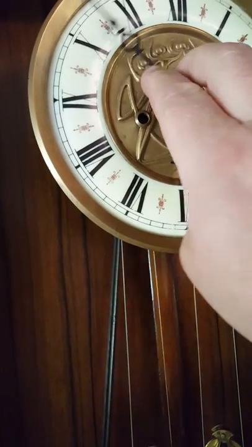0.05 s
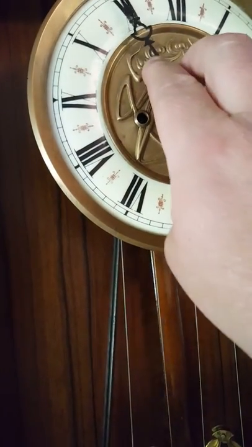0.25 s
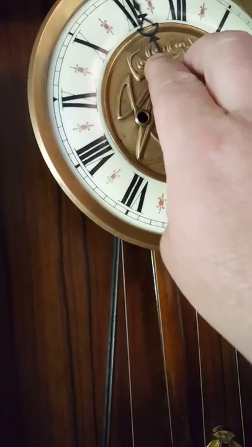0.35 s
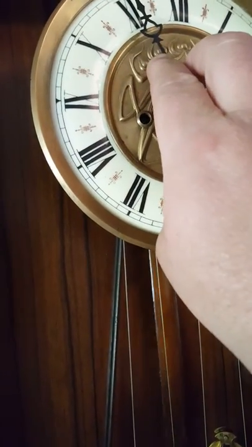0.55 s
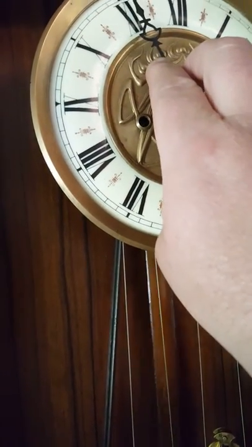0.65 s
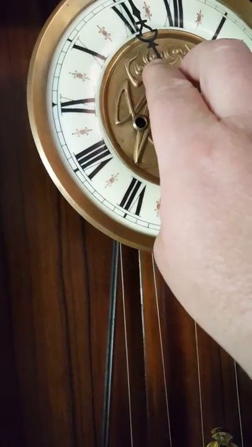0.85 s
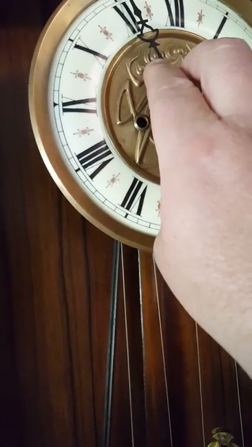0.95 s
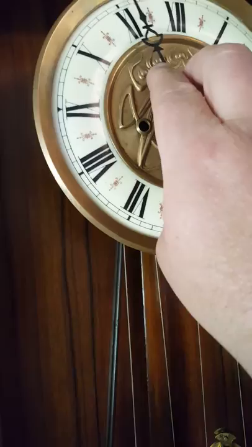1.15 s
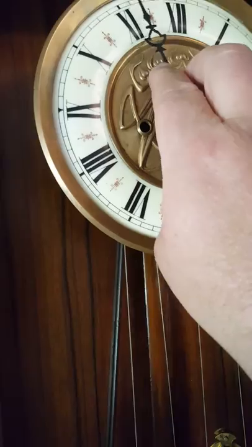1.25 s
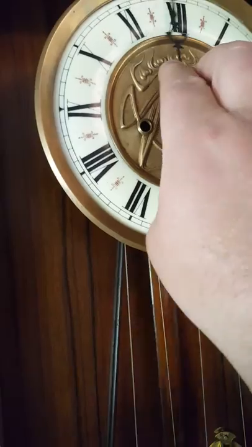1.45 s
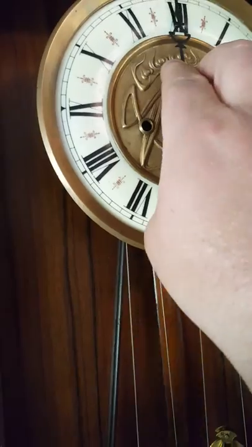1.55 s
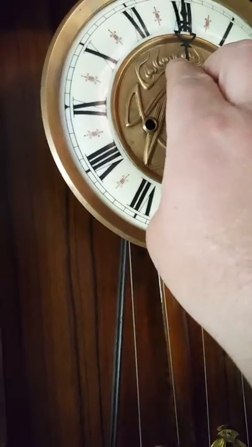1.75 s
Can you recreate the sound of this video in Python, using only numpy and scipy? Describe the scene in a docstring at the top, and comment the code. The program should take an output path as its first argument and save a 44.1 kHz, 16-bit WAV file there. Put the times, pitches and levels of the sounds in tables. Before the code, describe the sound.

Sharp, uneven clicks come from a wooden wall clock being set by hand, close by in a quiet room. Two loud clattering snaps come first, then a softer tick and a final snap, over faint rubbing and a slight gong hum.

```python
"""A quiet room, close to a wooden wall clock whose minute hand is being pushed round by hand.
The arbor rubs as it turns, a small pin ticks, a spring flicks and rattles, a lever snaps off its cam,
slack wheel teeth knock, and near the hour the strike catch lets go and leaves thin steel rods ringing.
Each contact is a noisy crack plus the part's clear modes, echoing in the cabinet and the room.
The heaviest blows set the case booming and leave the gong humming faintly."""
import sys
import numpy as np
from scipy import signal
from scipy.fft import rfft, irfft, next_fast_len
from scipy.io import wavfile

SR = 44100
rng = np.random.default_rng(int(sys.argv[2]) if len(sys.argv) > 2 else 0)


def unload_wav(signal):
    """Save mono or channel-first audio to the path in sys.argv[1] as 16-bit WAV at rate SR, clipped to [-1, 1]."""
    wavfile.write(
        sys.argv[1],
        SR,
        np.round(np.clip(np.atleast_2d(signal).T, -1, 1) * 32767).astype(np.int16),
    )


N = 79380

# the arbor's rub as the hand moves (t/s, level/dB)
RUB_LEVELS = [(0, -60), (0.062, -55), (0.149, -69.5), (0.197, -59), (.33, -58), (0.432, -54), (.6, -58),
              (.76, -64), (0.882, -70), (1.5, -66.5)]
# noise colours of the rub and the room's hush (f/Hz, relative level/dB)
RUB_COLOUR = [(100, -3), (190, 14.5), (320, 0), (600, 3.5), (1200, -2.5), (2500, -7), (4800, -9.5),
              (8000, -17.5), (15500, -23.5)]
HUSH_COLOUR = [(20, -15), (75, 2.5), (116, -13), (180, 0.5), (330, -17.5), (700, -37), (1600, -32.5),
               (3800, -33), (5200, -45), (10000, -40.5), (15500, -31)]
# each part's hits (t/s, crack level/dB, ring level/dB, brightness/dB per octave)
PIN_TICKS = [(.0545, -14, -19, 0), (0.0978, -27.5, -42, 0.5), (.774, -15.5, -19, 0.5),
             (1.541, -15.5, -17, 0)]
SPRING_FLICKS = [(.2033, -2, 0, 1.06), (.2148, -3.5, -2.5, -0.3), (.224, -10, -3, 1), (.232, -10, -23, -2),
                 (.240, -12.5, -11.5, 0.5)]
LEVER_SNAPS = [(.4408, 4.3, -4.5, -0.26), (.4448, -15.5, -33, 2), (.448, -5, -14.5, -0.9),
               (.4841, -5.5, -12.5, 0.1), (.4898, -1, -16, -1.5), (.515, -14, -21.5, -2)]
WHEEL_KNOCKS = [(.7903, -14, -22, 0), (.7975, -20, -17.5, -3), (.936, -60, -37.5, -3.5)]
CATCH_RELEASE = [(1.4765, -19, -25.5, -3.5), (1.4822, -6, -37, 0.5), (1.491, -1.65, -1, 1.07),
                 (1.5052, -8, -12, 0.1), (1.513, -12, -16, -3)]
# each part's clear modes (f/Hz, relative level/dB, t60/s)
PIN_MODES = [(1134, -27, 0.093), (1322, -28, 0.064), (1415, -22, 0.067), (2268, -27, 0.083),
             (3130, -25.5, 0.051), (5875, -26, 0.027)]
SPRING_MODES = [(456.5, -34, 0.12), (626, -37, 0.065), (783, -36, 0.13), (1588, -44.5, 0.2),
                (1773, -42, 0.062), (2436, -37.5, 0.1), (2690, -38, 0.087), (4480, -35.5, 0.052),
                (6200, -37, 0.057)]
CASE_MODES = [(63.4, -60, 1), (96.1, -49, 0.63), (185, -55.5, 0.22), (239.3, -53.5, 1)]
GONG_MODES = [(444.6, -55, 3.01), (610, -76, 3.6)]
LEVER_MODES = [(316, -33, 0.077), (450.5, -24.5, 0.12), (504, -55, 0.11), (795, -24.5, 0.091),
               (1554, -33.5, 0.08), (2536, -29, 0.11), (3200, -24, 0.078), (3460, -28, 0.062)]
WHEEL_MODES = [(625, -34, 0.16), (821.4, -27, 0.097), (1096, -28, 0.054), (2270, -33.5, 0.1)]
CATCH_MODES = [(438.5, -39, 0.13), (499, -39, 0.087), (810, -29.5, 0.11), (1146, -23, 0.055),
               (1295, -28, 0.033), (2307, -36.5, 0.096), (3074, -37, 0.11), (4004, -32, 0.071),
               (6140, -27, 0.022), (7490, -16.5, 0.012)]
ROD_MODES = [(1153, -56.5, 0.76), (1334, -72, 0.96)]
# colour of each part's crack, its many short modes together (f/Hz, relative level/dB)
PIN_CRACK = [(300, -11), (800, 1.5), (1300, 9.5), (1800, -2.5), (2800, 9), (4000, -3.5), (6000, -3.5),
             (11000, -19.5), (15500, -20.5)]
SPRING_CRACK = [(200, -13.5), (650, 8), (900, -1.5), (1300, 1), (2600, 4.5), (6400, 2), (7700, -13.5),
                (9500, -7), (15500, -21)]
LEVER_CRACK = [(170, -48), (310, -3), (750, 10), (1300, 4), (1850, 1), (3200, 5), (4200, -4), (5700, 1.5),
               (7700, -10), (10500, -6.5), (15500, -24)]
WHEEL_CRACK = [(250, -7.5), (800, 13), (1700, 4.5), (3200, 6), (5000, -6.5), (8000, -6.5), (15000, -24)]
CATCH_CRACK = [(330, -9.5), (700, 7), (1100, 9), (1800, -5), (2900, 1.5), (5000, -3), (8300, -1),
               (10000, -18), (13000, -9)]
# heavy blows that shake the whole clock (t/s, case level/dB, gong level/dB)
JOLTS = [(.204, -1.5, -4), (.442, 2, -4.5), (1.491, -8, -9.5)]
# decay of the cracks and the two reverbs (f/Hz, t60/s)
CRACK_T60 = [(300, 0.053), (1200, 0.095), (3000, 0.048), (6000, 0.043), (12000, 0.046)]
CABINET_T60 = [(300, 0.27), (3000, 0.097), (12000, 0.14)]
ROOM_T60 = [(150, 0.17), (600, 0.32), (2500, 0.37), (6000, 0.32), (13000, 0.29)]
# tone of the two reverbs (f/Hz, level/dB)
CABINET_COLOUR = [(300, -16), (3000, -13.5), (12000, -19.5)]
ROOM_COLOUR = [(150, 5.5), (600, -10), (2500, -13.5), (6000, -17), (13000, -18)]
# stereo lean of the clicks (f/Hz, left minus right level/dB)
PAN = [(300, 0.5), (800, -1), (1130, 8.5), (1500, -1.5), (2600, -2), (4000, -2), (6500, -7.5), (8000, 5.5),
       (9700, 9), (12000, 6), (15000, 7.5)]
# how alike the two channels' noise is (f/Hz, correlation)
CORRELATION = [(100, 0.91), (450, 0.77), (900, 0.16), (2000, 0.07), (6000, 0.016)]

ATTACK_S, MODE_SCATTER_DB, PHASE_SPREAD_PER_HZ = 0.00093, 2.5, 0.00042
WAVER_RADIANS, WAVER_PER_S = 0.15, 129  # loose parts do not ring quite cleanly
CRACK_DB, PUNCH_GAIN, PUNCH_S = -1, 0.64, 0.0016  # the first instant of a crack stands out
RING_SEND_DB, GLINT_SEND_DB = -3, -6  # clear tones feed the reverb less than cracks do


def amp(db):
    """Decibels to gain."""
    return np.exp(np.asarray(db) * np.log(10) / 20)


def along(points, hz):
    """A curve read on a log frequency axis."""
    f, v = np.transpose(points)
    return np.interp(np.log(hz + 1), np.log(f + 1), v)


def tilted(rows, slope):
    """Rows (f/Hz, level/dB, ...) tilted by slope dB per octave about 2 kHz."""
    return [(hz, db + slope * np.log2(hz / 2000), *rest) for hz, db, *rest in rows]


def fade(t, t60, attack):
    """A quick rise and an exponential decay."""
    return np.exp(-np.log(1000) * t / t60) * (1 - np.exp(-t / attack))


def add(track, s, sound):
    """Mix a sound into the track at time s."""
    part = track[:, max(0, round(s * SR)):][:, :sound.shape[-1]]
    part += sound[..., :part.shape[1]]


def filtered(x, response):
    """EQ x with a gain curve over frequency."""
    size = next_fast_len(N + SR // 4)
    return irfft(rfft(x, size) * response(np.fft.rfftfreq(size, 1 / SR)), size)[..., :N]


def noise_pair(size):
    """Frequencies and spectra of stereo white noise, narrow in the bass and wide on top."""
    hz = np.fft.rfftfreq(size, 1 / SR)
    width = np.arccos(np.clip(along(CORRELATION, hz), -1, 1)) / 2
    mid, side = rfft(rng.standard_normal((2, size))) * [np.cos(width), np.sin(width)]
    return hz, np.array([mid + side, mid - side])


def noise_bed(colour):
    """Steady coloured stereo noise of rms 1."""
    hz, spectra = noise_pair(N)
    noise = irfft(spectra * amp(along(colour, hz)), N)
    return noise / noise.std()


def dense_ring(colour, t60s, attack, size):
    """Countless overlapping modes: each noise band has its own energy and decay."""
    hz, spectra = noise_pair(size)
    t, out = np.arange(size) / SR, np.zeros((2, size))
    edges = np.linspace(np.sqrt(60), np.sqrt(17000), 16) ** 2
    for lo, hi in zip(edges, edges[1:]):
        gain = amp(along(colour, hz)) * (hz >= lo) * (hz < hi)
        band = irfft(spectra * gain, size) * fade(t, along(t60s, np.sqrt(lo * hi)), attack)
        out += band * np.sqrt(np.mean(gain ** 2) / np.sum(band ** 2, axis=1, keepdims=True))
    return out


def ring(modes, attack, size, waver=0):
    """Clear modes of alternating sign; the higher ones spread further in phase from left to right."""
    t, out = np.arange(size) / SR, np.zeros((2, size))
    for k, (hz, db, t60) in enumerate(modes):
        scatter, skew, *drift = rng.standard_normal(200)
        phase = k * np.pi + np.array([[1], [-1]]) * np.tanh(skew) * hz * PHASE_SPREAD_PER_HZ
        phase = phase + waver * np.interp(t * WAVER_PER_S, np.arange(len(drift)), drift)
        envelope = amp(db + MODE_SCATTER_DB * scatter) * fade(t, t60, attack)
        out += envelope * np.sin(2 * np.pi * hz * t + phase)
    return out


def reverb(x):
    """The cabinet's quick echoes and the room's tail, wet only."""
    tail = dense_ring(ROOM_COLOUR, ROOM_T60, attack=0.016, size=24000)
    add(tail, 0, dense_ring(CABINET_COLOUR, CABINET_T60, attack=0.011, size=8192))
    return signal.fftconvolve(x, tail, axes=1)[:, :N]


def clicks(hits, modes, crack_colour, send_db):
    """Each hit on a part gives a crack and rings its modes; both feed the reverb."""
    cracks, rings = np.zeros((2, 2, N))
    for s, crack_db, ring_db, brightness in hits:
        crack = dense_ring(tilted(crack_colour, brightness), CRACK_T60, ATTACK_S, size=4096)
        punch = 1 + PUNCH_GAIN * np.exp(-np.arange(crack.shape[1]) / SR / PUNCH_S)
        add(cracks, s, amp(CRACK_DB + crack_db) * punch * crack)
        tone = ring(tilted(modes, brightness), ATTACK_S, size=10000, waver=WAVER_RADIANS)
        add(rings, s, amp(ring_db) * tone)
    return cracks + rings + amp(send_db) * reverb(cracks + amp(RING_SEND_DB) * rings)


def room_hush():
    """A low, steady bed of room tone."""
    return amp(-66) * noise_bed(HUSH_COLOUR)


def arbor():
    """The hand's arbor rubs softly as it turns."""
    level_db = np.interp(np.arange(N) / SR, *np.transpose(RUB_LEVELS))
    return amp(level_db) * noise_bed(RUB_COLOUR)


def pin():
    """The small pin ticks; its highest mode adds a bright glint that dies almost at once."""
    glint_hz, glint_db, glint_t60 = 13000, -11.5, 0.011
    glints = np.zeros((2, N))
    for s, _, ring_db, _ in PIN_TICKS:
        add(glints, s, amp(ring_db) * ring([(glint_hz, glint_db, glint_t60)], ATTACK_S, size=2048))
    ticks = clicks(PIN_TICKS, PIN_MODES, PIN_CRACK, send_db=2.5)
    return ticks + glints + amp(GLINT_SEND_DB) * reverb(glints)


def spring():
    """The lifting spring flicks, then rattles in quick, softer hits."""
    return clicks(SPRING_FLICKS, SPRING_MODES, SPRING_CRACK, send_db=2)


def case_and_gong():
    """Heavy blows swell into a low boom in the wooden case and set the gong humming."""
    out = np.zeros((2, N))
    for s, case_db, gong_db in JOLTS:
        add(out, s, amp(case_db) * ring(CASE_MODES, attack=0.019, size=SR // 2))
        add(out, s, amp(gong_db) * ring(GONG_MODES, ATTACK_S, size=N))
    return out


def lever():
    """The lever snaps off its cam: one hard crack, then a short clatter."""
    return clicks(LEVER_SNAPS, LEVER_MODES, LEVER_CRACK, send_db=0.1)


def wheel():
    """Slack wheel teeth knock lightly together."""
    return clicks(WHEEL_KNOCKS, WHEEL_MODES, WHEEL_CRACK, send_db=2)


def strike_catch():
    """The strike catch lets go in a tight cluster of clicks."""
    return clicks(CATCH_RELEASE, CATCH_MODES, CATCH_CRACK, send_db=3)


def rods():
    """Thin steel rods ring on after the release."""
    out = np.zeros((2, N))
    add(out, s=1.4915, sound=ring(ROD_MODES, ATTACK_S, size=SR // 2))
    return out


def scene():
    """The movement's clicks, panned by frequency, over the clock's ring, the rub and the hush."""
    movement = spring() + lever() + pin() + wheel() + strike_catch()
    movement = filtered(movement, lambda hz: amp(np.array([[.5], [-.5]]) * along(PAN, hz)))
    return movement + case_and_gong() + rods() + arbor() + room_hush()


def record(dry):
    """A steep low-pass trims the very top."""
    cutoff_hz = 16000
    return filtered(dry, lambda hz: 1 / np.sqrt(1 + (hz / cutoff_hz) ** 160))


dry = scene()
out = record(dry)
unload_wav(out)
```